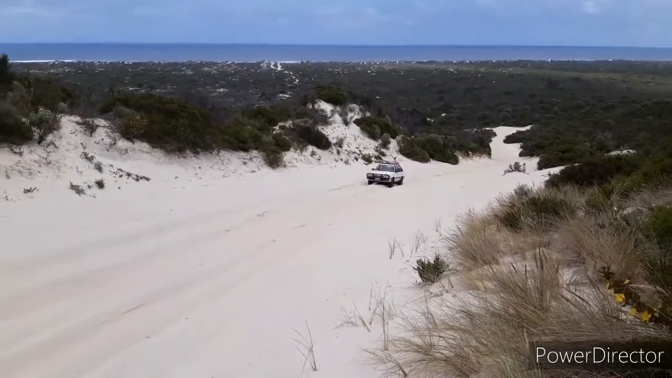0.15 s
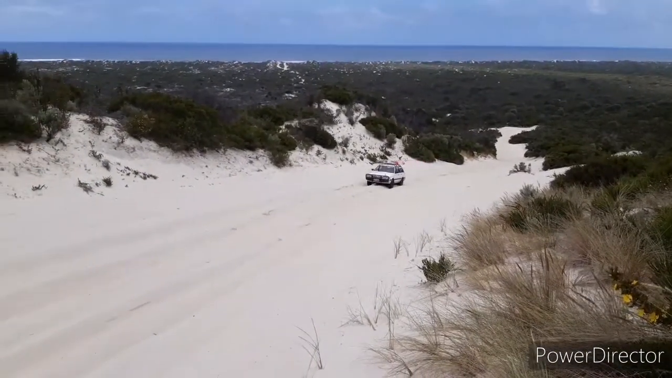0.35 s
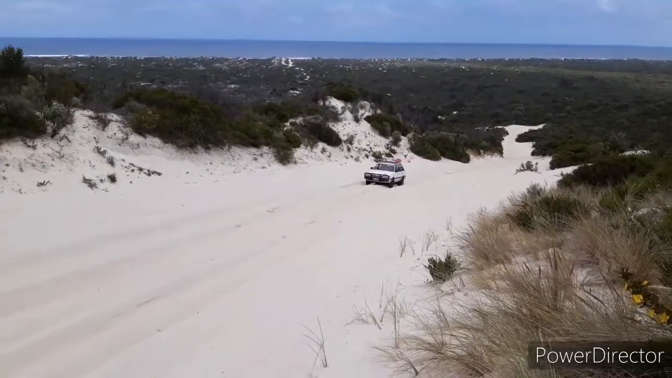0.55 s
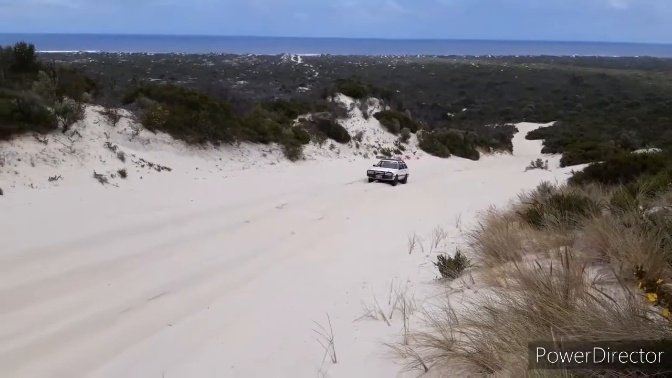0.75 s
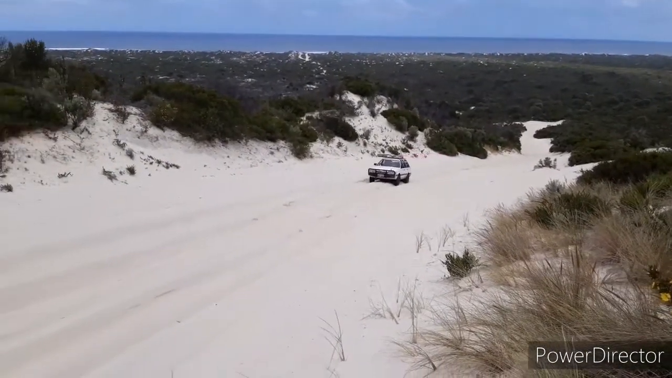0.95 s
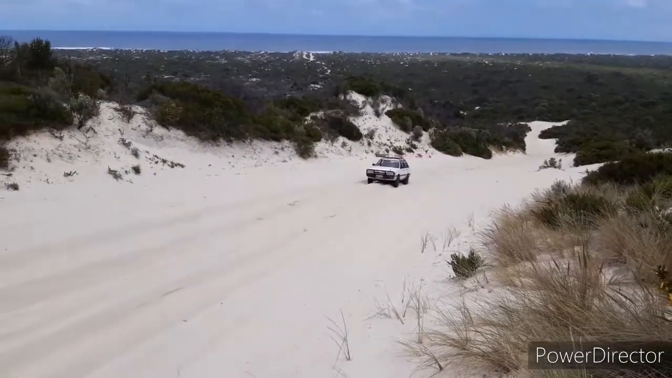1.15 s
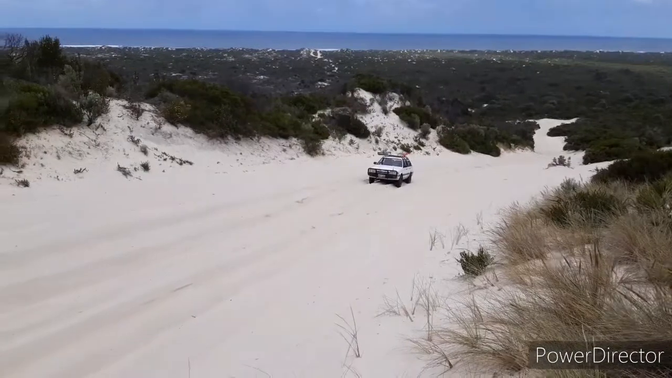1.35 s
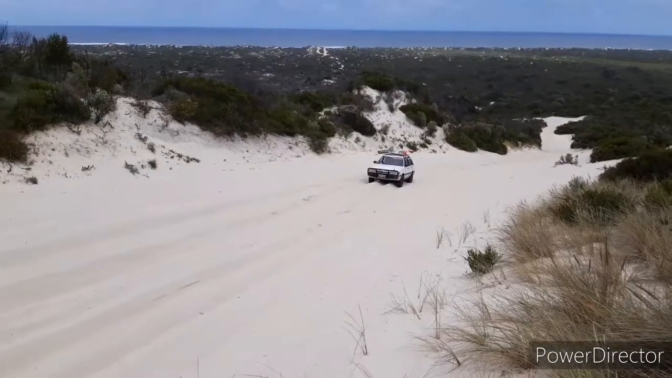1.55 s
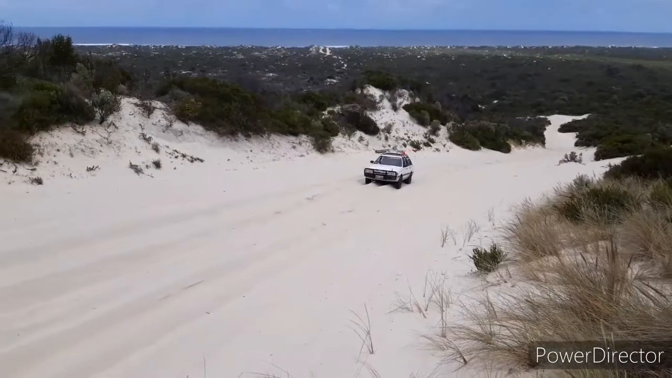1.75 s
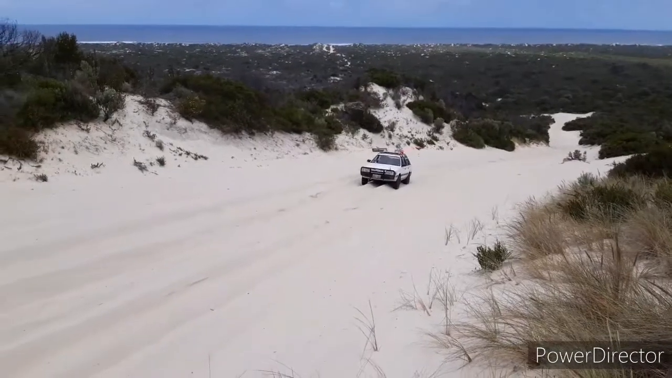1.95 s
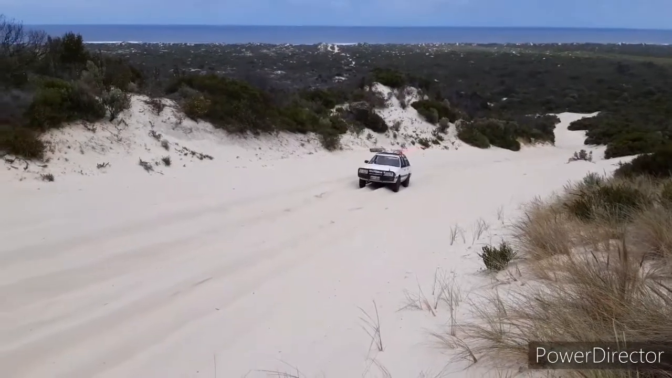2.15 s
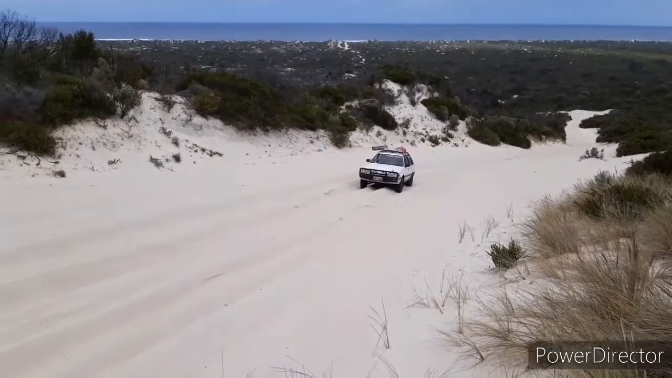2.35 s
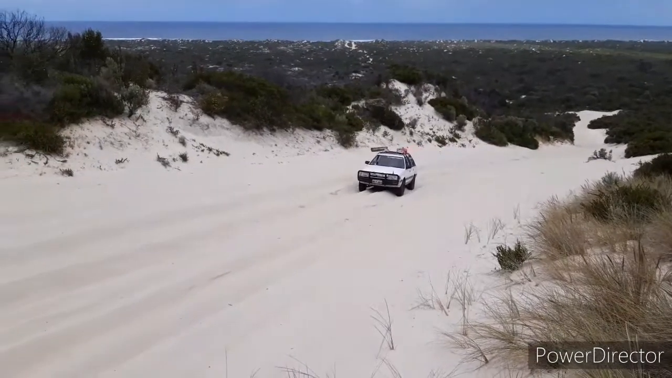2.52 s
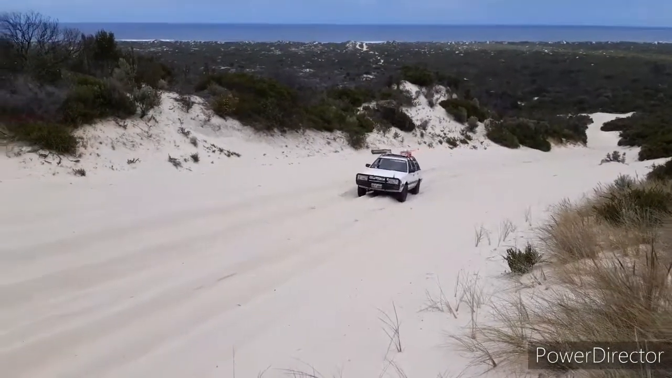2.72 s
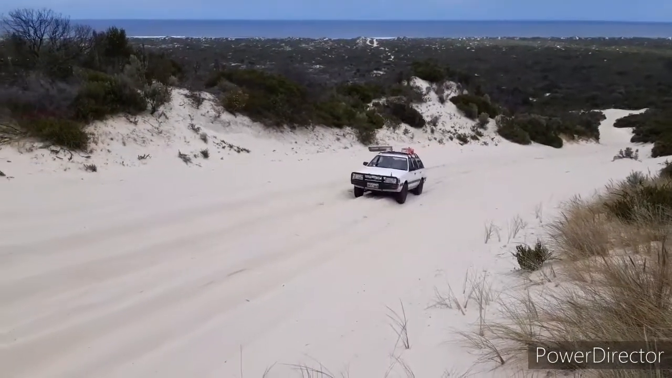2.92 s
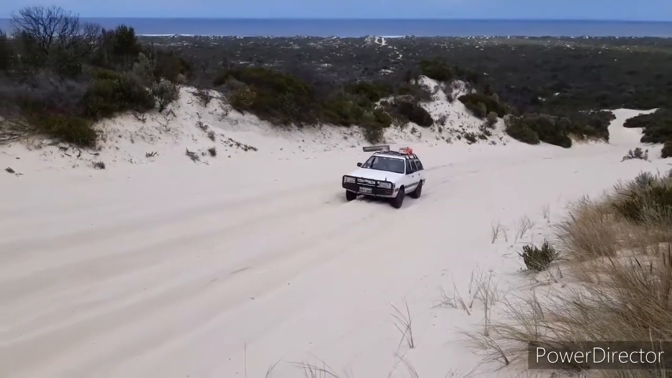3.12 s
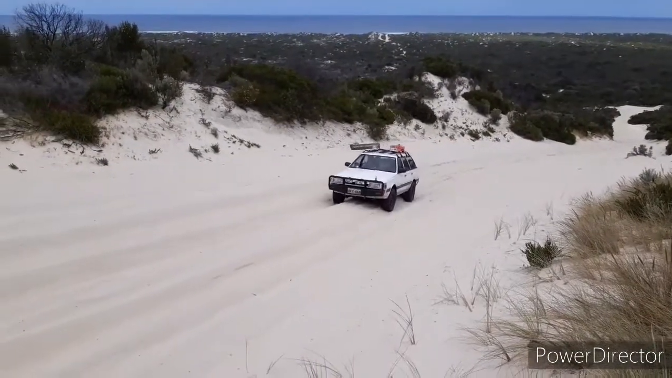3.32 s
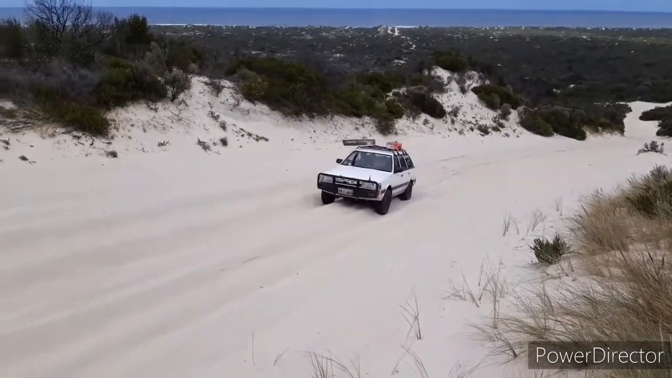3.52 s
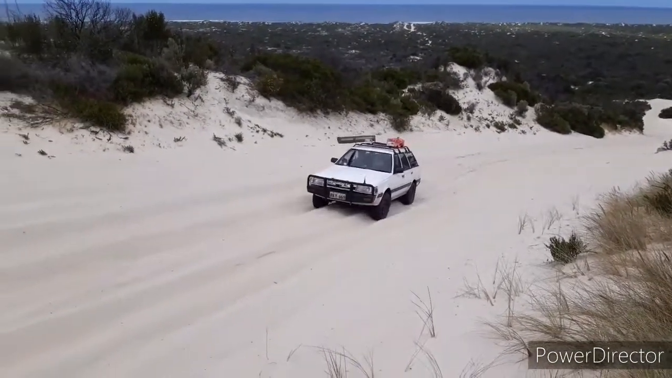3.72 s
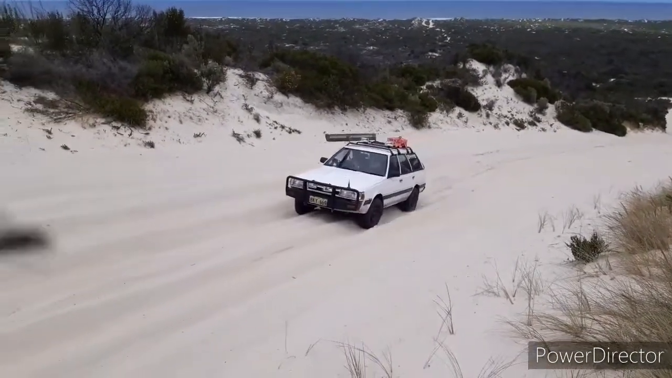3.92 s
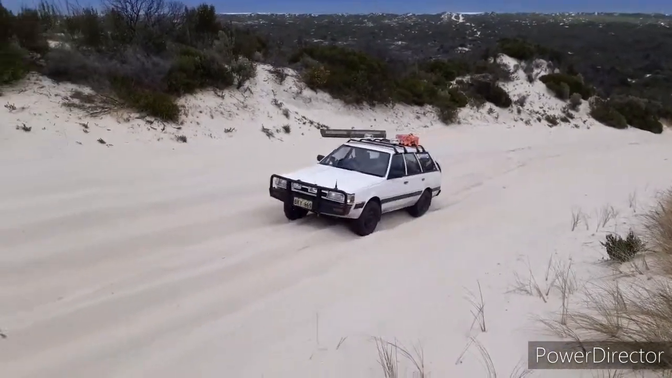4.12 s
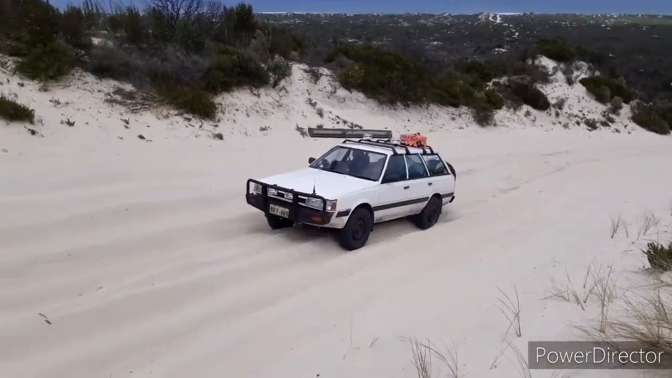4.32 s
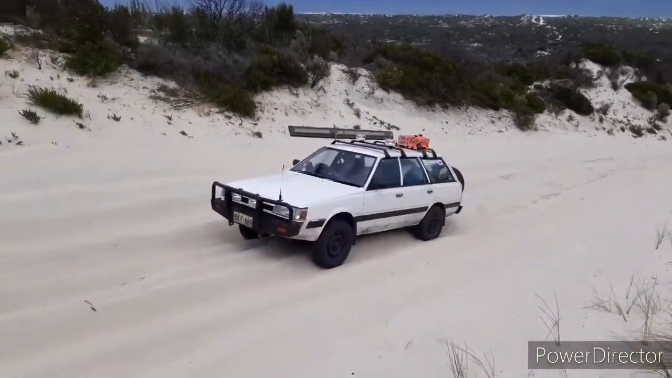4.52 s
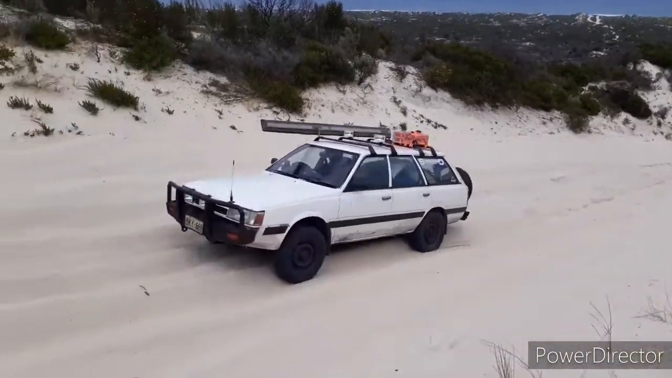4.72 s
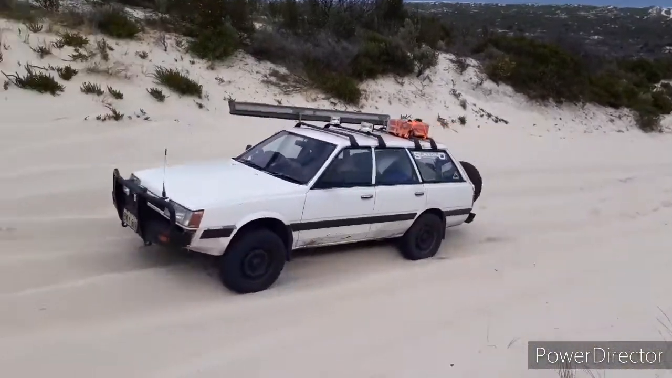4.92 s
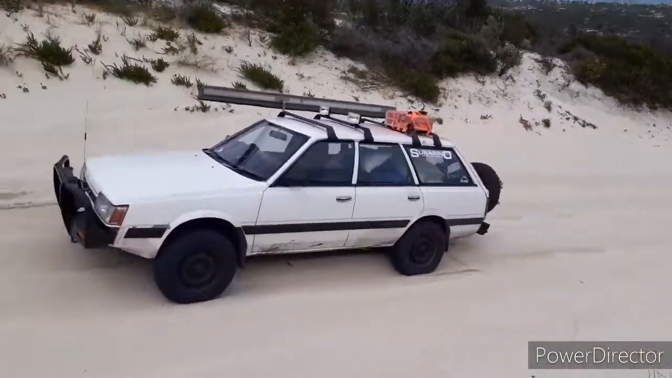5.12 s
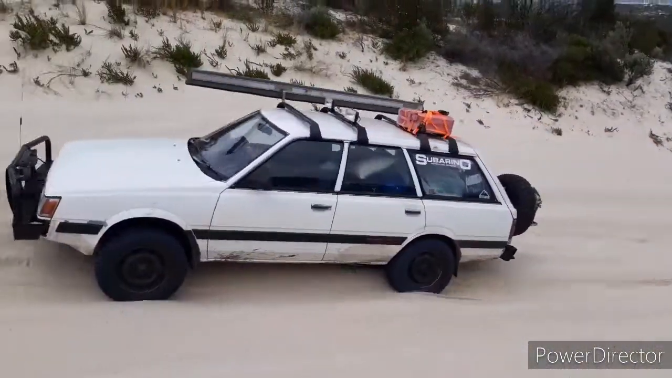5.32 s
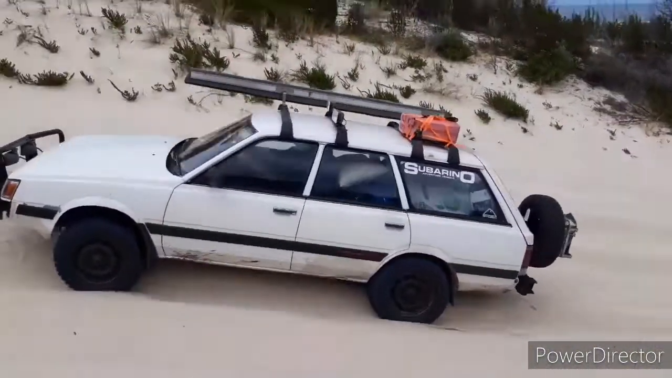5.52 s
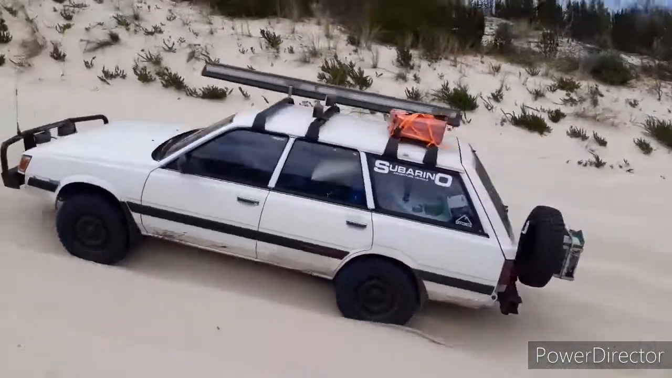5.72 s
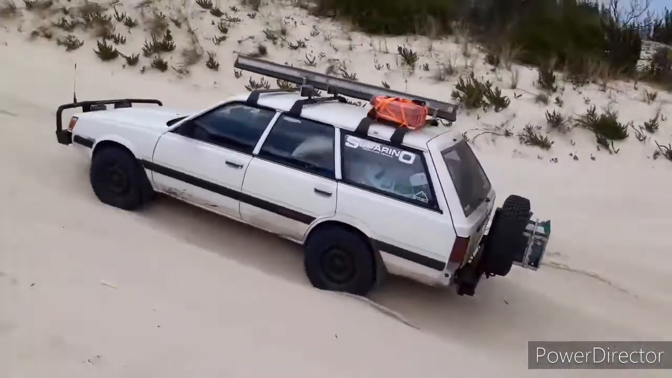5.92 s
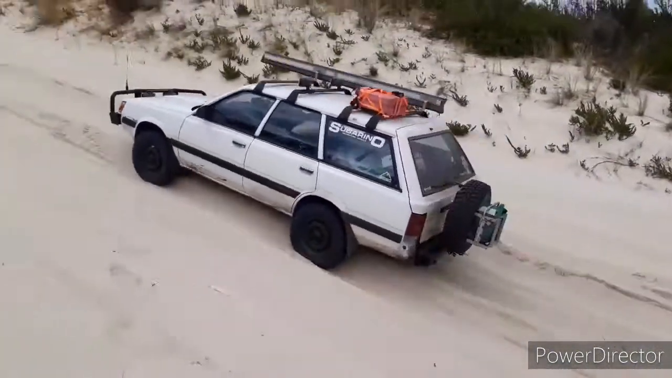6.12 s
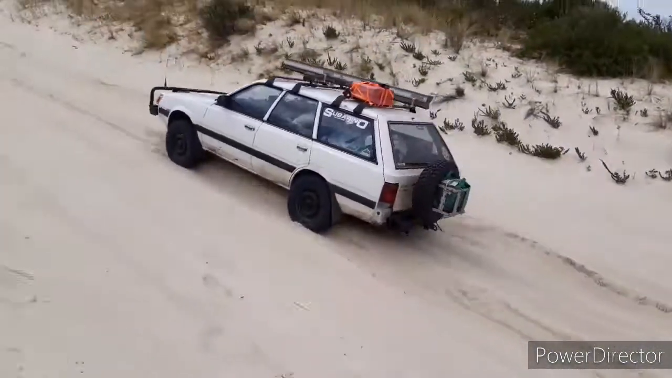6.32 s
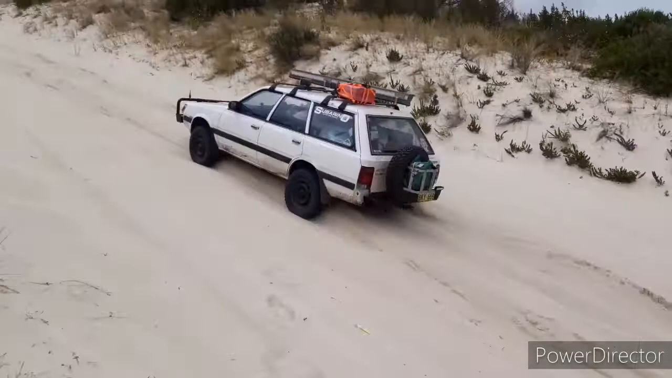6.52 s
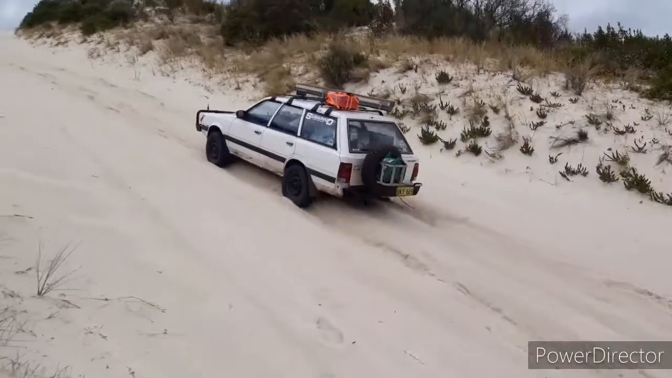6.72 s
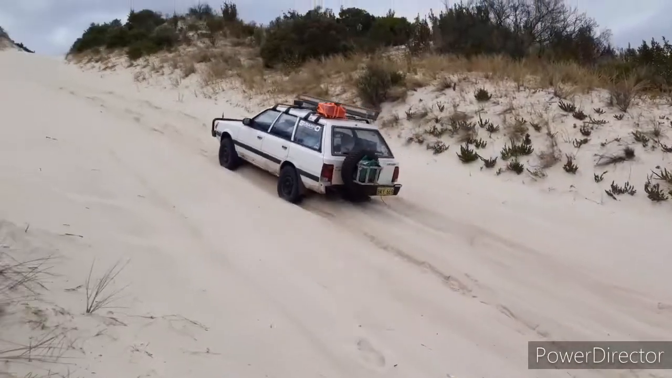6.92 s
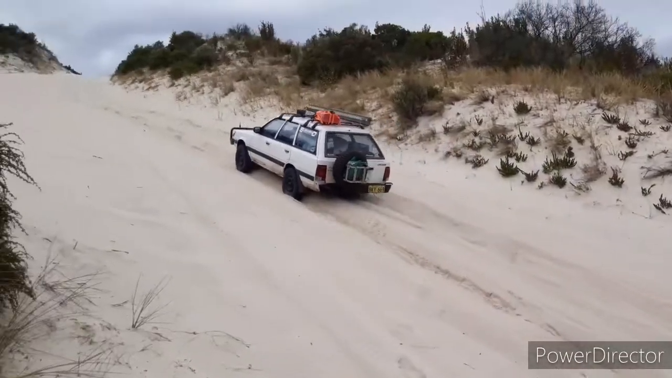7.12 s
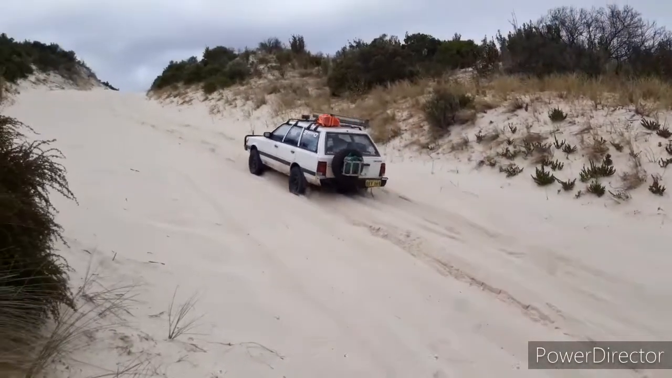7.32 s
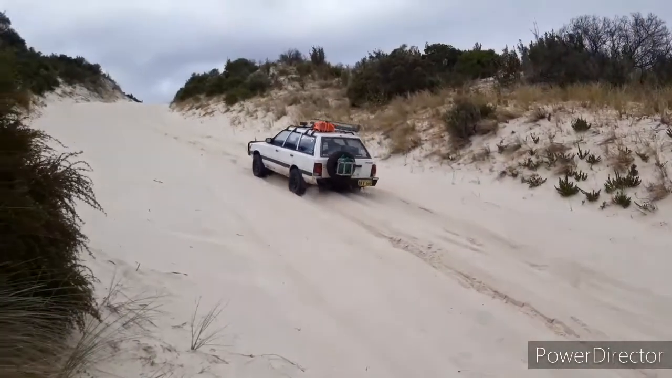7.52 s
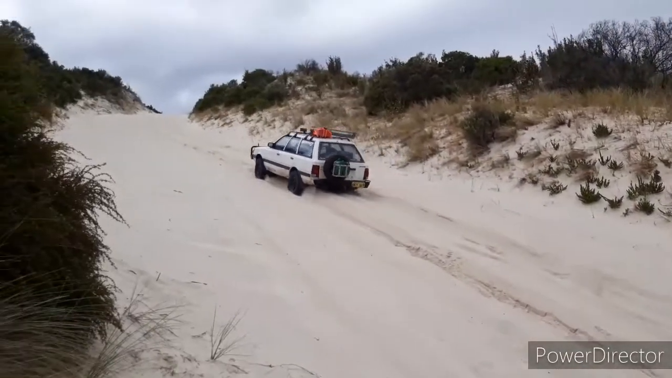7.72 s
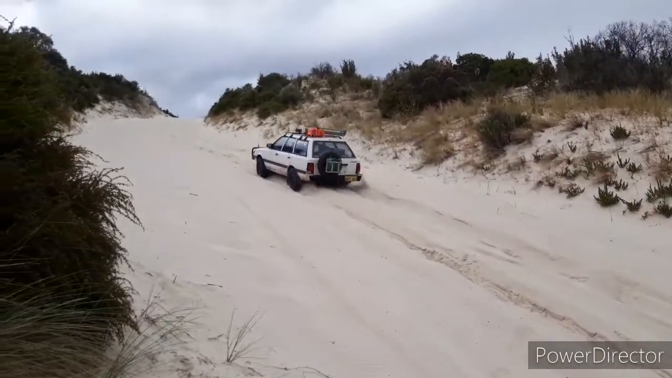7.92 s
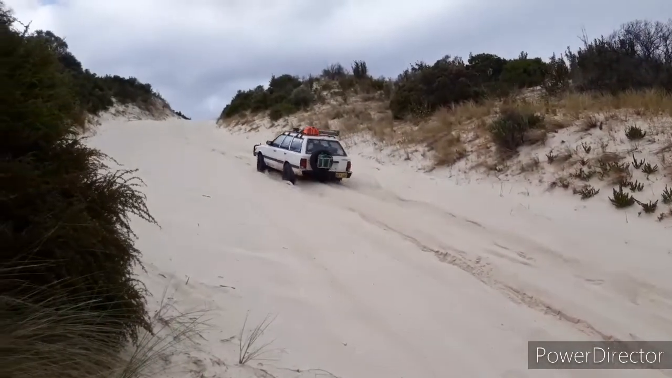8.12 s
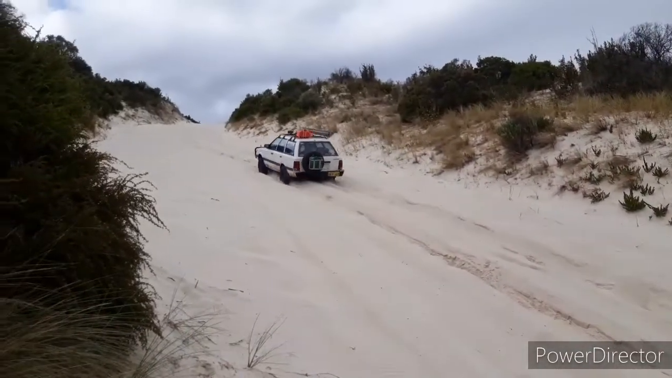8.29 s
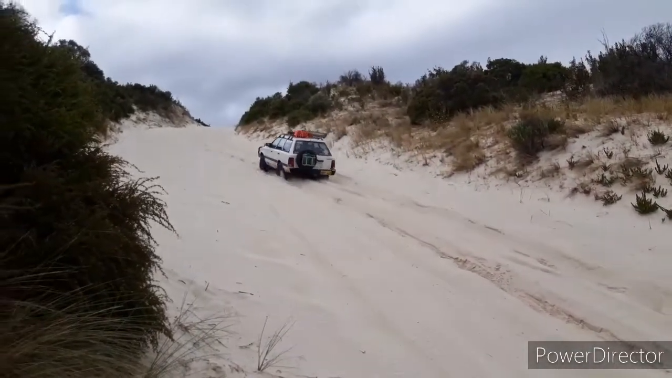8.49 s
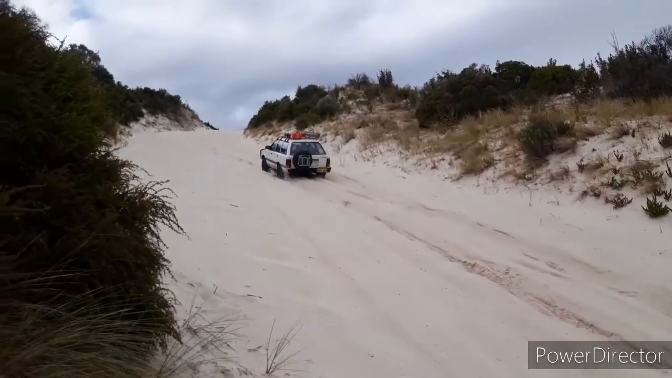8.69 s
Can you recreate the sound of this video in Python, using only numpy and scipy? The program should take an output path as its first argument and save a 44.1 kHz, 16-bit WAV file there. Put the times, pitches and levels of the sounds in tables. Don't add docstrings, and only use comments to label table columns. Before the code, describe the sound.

A station wagon pulls steadily uphill over soft sand, its throbbing hum swelling to a close pass before raspy tailpipe cracks recede up the slope.

```python
import sys
import numpy as np
from scipy import signal
from scipy.fft import rfft, irfft
from scipy.io import wavfile
from scipy.ndimage import uniform_filter1d, map_coordinates

SR = 44100
rng = np.random.default_rng(int(sys.argv[2]) if len(sys.argv) > 2 else 0)


def generate_wav(signal):
    frames = np.transpose(np.atleast_2d(signal))
    scaled = np.clip(frames, -1, 1) * 32767
    pcm = np.round(scaled).astype(np.int16)
    wavfile.write(sys.argv[1], SR, pcm)


def volts(x):
    e = np.asarray(x, float) / 20
    return 10 ** e


N = 385875
T = np.arange(N) / SR
HZ = np.fft.rfftfreq(N, 1 / SR)

# (time [s], engine cycles [1/s])
ENGINE_SPEED = [(0.0, 44), (0.34, 42.6), (0.68, 40.7), (1.14, 40), (2.19, 44), (2.34, 41.4), (2.41, 43.4),
                (3.38, 43), (3.53, 45), (3.75, 43.4), (4.0, 44.4), (4.68, 44.6), (4.85, 43.3), (5.55, 41.6),
                (6.63, 41), (7.8, 40.9), (8.7, 40.3), (8.75, 41.8)]
# (time [s], hum level [dB])
HUM_LEVEL = [(0, -41), (.7, -43), (1.3, -36), (2.3, -37.5), (3.1, -31.5), (3.85, -29.5), (4.3, -26.5),
             (5.1, -26), (5.4, -22.5), (6, -23), (6.25, -21), (6.75, -23.5), (7.1, -23), (7.4, -25.5),
             (8.75, -29)]
NEAR_DB = -30
# (multiple [1], level [dB])
NOSE_ORDERS = [(1, -59), (2, -17), (3, -1), (4, 0), (5, -1.5), (6, -4.5), (7, -2.5), (8, 0), (9, -63),
               (10, -32), (11, -10.5), (12, -6.5), (13, -17), (14, -15), (15, -19), (16, -11), (17, -10),
               (18, -12), (19, -45), (20, -25), (21, -44), (22, -49.5), (23, -19), (24, -36), (25, -48),
               (26, -27)]
TAIL_ORDERS = [(1, -40), (2, -40), (3, -3), (4, -3), (5, -3.5), (6, -10.5), (7, -14.5), (8, 0), (9, -9),
               (10, -62), (11, -9.5), (12, -5.5), (13, -8), (14, -11.5), (15, -15), (16, -15), (17, -7.5),
               (18, -23), (19, -3), (20, -31), (21, -35), (22, -47), (23, -60), (24, -19), (25, -26.5),
               (26, -30)]
# (time [s], half length [s], level [dB])
FIRING_TURNS = [
    (4.65, 0.67, 5.5),
    (6.05, 0.15, -8.5),
]
PIPE_TURNS = [(.15, 0.19, -4), (.4, 0.11, 4), (.9, .35, 10), (2.55, 0.24, -9), (2.31, 0.058, 7.5),
              (4.45, 0.45, -7), (5.25, 0.22, -5), (5.9, .25, 4), (8.6, .8, 4.5)]
UPPER_TURNS = [
    (3, .9, 3),
    (5.5, 1, -0.5),
    (6.25, .12, 3.5),
]
# (time [s], half length [s], level [dB])
SILL_BOOM = [
    (5.84, 0.3, 6.5),
    (4.7, 0.31, -6),
]
# (time [s], pitch [Hz], level [dB])
GEAR_WHINE = [(0.0, 785, -35.5), (0.56, 770.5, -35.5), (2.03, 790.6, -34), (4.09, 785.6, -23),
              (4.25, 787.4, -31), (4.79, 766.6, -17.5), (6.02, 788, -23), (6.18, 768.0, -23),
              (6.3, 790, -37)]
# (frequency [Hz], level [dB])
ROAR_COLOUR = [(25, -32), (60, -9), (110, 0.5), (250, 2.5), (350, -0.5), (420, -5.5), (520, -9),
               (700, -15.5)]
BLOCK_COLOUR = [(350, -32), (500, -8.5), (650, 0), (780, 7.5), (900, -4.5), (1000, -19), (1300, -24.5)]
# (time [s], half length [s], level [dB])
WIND_GUSTS = [
    (8.32, 0.51, 5.17),
    (2.22, 0.46, 4.5),
    (0.37, 0.07, 4),
]
# (time [s], level [dB])
FAN_LEVEL = [(0, -31.5), (1.7, -31), (2.05, -29.5), (3.5, -26.5), (4.2, -26.5), (4.7, -25), (5.3, -29),
             (5.5, -32), (5.7, -38), (5.9, -42)]
# (frequency [Hz], level [dB])
NOSE_COLOUR = [(500, -11.5), (850, -20.5), (1000, -7.5), (1500, -9.5), (2000, -12), (3300, -11.5),
               (5000, -15), (6500, -19.5), (8500, -34.5), (12000, -32.5), (14300, -36.5), (15600, -41)]
# (time [s], half length [s], level [dB])
SAND_SHADE = [(5.3, 0.57, -3.5)]
# (time [s], half length [s], level [dB])
BODY_SCATTER = [(5.3, 1, 9)]
GRIT_SCATTER = [(5.6, .45, 5)]
# (time [s], half length [s], delay [ms])
ECHO_SHORTER = [(5.3, 1.1, -.2)]
# (time [s], half length [s], share [1])
ECHO_LOST = [(5.55, .5, -.9)]
# (time [s], half length [s], left over right [dB])
PAN_TURNS = [
    (1.5, 1.2, -.5),
    (5.7, .25, .8),
    (8.75, .8, -1),
]
# (time [s], level [dB])
CRACK_LEVEL = [(5.3, -38), (6.1, -33.5), (6.25, -30), (6.73, -29.5), (6.96, -34), (7.1, -32.5),
               (7.32, -34.5), (7.48, -40), (7.9, -40), (8.05, -36.5), (8.2, -38.5), (8.5, -36), (8.75, -40)]
FIRING_STRENGTH = [0, -12, -7, -12]
# (frequency [Hz], level [dB])
TAIL_COLOUR = [(500, -75), (850, -11.5), (903, -28), (1010, 5.5), (1150, -34), (1300, -2), (1780, -8),
               (1990, -12.5), (2680, -13), (3040, 2.5), (3730, 5.5), (4500, 11.5), (5200, 12), (6450, -2.5),
               (8550, -23.5), (11700, -22), (15500, -23)]
FAR_COLOUR = [(500, -16), (850, -12), (1010, -7.5), (1290, -19.5), (1810, -17), (1910, -35), (2050, -13),
              (2330, -12), (2530, -25), (2910, -12), (3400, -8), (3700, -18), (3820, 0), (4020, 0),
              (4260, -14), (4550, -6), (5450, -12), (9500, -46.5), (20900, -120)]
# (frequency [Hz], width [Hz], level [dB])
PIPE_RINGS = [(3037, 38, 4.5), (3514, 220, 1.5), (4550, 300, 3), (6030, 150, 5), (7100, 140, -3)]
# (time [s], half length [s], level [dB])
PIPE_AIM = [(6.9, 0.22, 8.2)]
SPIT_AIM = [(6.55, 0.77, 7.1)]
SILENCER_AIM = [(6.05, 0.66, 19.5)]
# (frequency [Hz], time [s], half length [s], level [dB])
SILENCER_FACES = [(930, 6, 0.24, -1.5), (1710, 5.66, 0.75, 1.5), (2027, 6.38, 0.78, 3),
                  (2082, 5.28, 0.32, 13.5), (2310, 7.156, 0.44, 11), (1290, 6.66, 0.35, 0)]
# (frequency [Hz], left over right [dB])
PORT_COLOUR = [(60, -1.5), (150, 0.5), (380, 1.5), (950, 1), (2380, 3), (5980, -3), (15000, 4)]


def evened(x):
    return x / np.sqrt(np.mean(x ** 2) + 1e-20)


def curves(rows):
    seconds, *columns = np.transpose(rows)
    return [np.interp(T, seconds, column) for column in columns]


def swells(rows):
    return sum(size * np.exp(-((T - s) / half) ** 2) for s, half, size in rows)


def step(s, length):
    return 1 / (1 + np.exp((s - T) / length))


def drift(seconds):
    size = int(seconds * SR)
    once = uniform_filter1d(rng.standard_normal(N), size)
    return evened(uniform_filter1d(once, size))


def follows(lead_db, level_db, slope):
    return level_db + slope * (lead_db - NEAR_DB)


def coloured(x, points):
    f, db = np.transpose(points)
    log_gain = np.log(volts(np.interp(np.log(HZ + 1), np.log(f), db, left=-70, right=-70)))
    cepstrum = irfft(log_gain, N) * np.where(T < T[-1] / 2, 2, 0)
    cepstrum[0] /= 2
    return irfft(rfft(x) * np.exp(rfft(cepstrum)), N)


def three_bands(x, levels_db):
    spectrum = rfft(x)
    above_low, above_middle = [1 / (1 + (edge / (HZ + 1)) ** 12) for edge in (2800, 7500)]
    parts = (1 - above_low, above_low - above_middle, above_middle)
    return sum(volts(db) * evened(irfft(spectrum * part, N)) for part, db in zip(parts, levels_db))


def resonate(x, hz, width):
    spin = np.exp(2j * np.pi * np.cumsum(hz * np.ones(N)) / SR)
    r = np.exp(-np.pi * width / SR)
    return 2 * (spin * signal.lfilter([1 - r], [1, -r], x / spin)).real


def delayed(x, ms):
    return map_coordinates(x, [np.arange(N) - ms * SR / 1000], order=3, mode="nearest")


def frozen(turns):
    return np.interp(1000 * (turns % 1), np.arange(1001), rng.standard_normal(1001))


def hum(turns, tail):
    near_db = curves(HUM_LEVEL)[0]
    groups = (near_db,
              follows(near_db, -27.5, 1.08) + swells(FIRING_TURNS),
              follows(near_db, -23.5, 1.01) + swells(PIPE_TURNS),
              follows(near_db, -37, 0.72) + swells(UPPER_TURNS))
    base_db, firing_db, pipe_db, upper_db = [db + 1.5 * step(4.7, -0.29) * drift(0.1) for db in groups]
    front, rear = dict(NOSE_ORDERS), dict(TAIL_ORDERS)
    out = np.zeros(N)
    for k in front:
        if k == 4:
            lead, db = 4, firing_db
        elif k == 8:
            lead, db = 8, pipe_db
        elif k < 8:
            lead, db = 3, base_db
        else:
            lead, db = 12, upper_db
        db = db + (1 - tail) * (front[k] - front[lead]) + tail * (rear[k] - rear[lead])
        db = uniform_filter1d(db, size=3000)
        db = db - 20 * (1 - tail) * (k >= 18)
        db = db + (k in (6, 7)) * swells(SILL_BOOM)
        waver = drift(0.11)
        late = (min(0.22 * (k - 1.5), 1.6) + 1.2 * (k == 8)) / (2 * np.pi * k)
        scramble = (1 - tail + tail * (k > 9) / 2) * rng.uniform(-1.1, 1.43)
        blur = 0.45 * np.roll(waver, 9000) + scramble
        out -= np.sqrt(2) * volts(db + 0.97 * waver) * np.cos(2 * np.pi * k * (turns - late) + blur)
    return out


def gear_whine():
    hz, db = [uniform_filter1d(c, size=4000) for c in curves(GEAR_WHINE)]
    turns = np.cumsum(hz) / SR
    fuzz = evened(resonate(resonate(rng.standard_normal(N), hz, 50), hz, 53))
    octave_level = volts(-6 + 2 * drift(0.065)) * np.clip((4.5 - T) / 0.8, 0, 1)
    octave = octave_level * np.sin(4 * np.pi * turns + 0.5 * drift(0.05))
    return volts(db) * (np.sqrt(2) * np.sin(2 * np.pi * turns) + 0.3 * fuzz + octave)


def tyre_and_block_noise(tyres_db, block_db):
    tyres = evened(coloured(rng.standard_normal(N), ROAR_COLOUR))
    block = evened(coloured(rng.standard_normal(N), BLOCK_COLOUR))
    return volts(tyres_db + 11 + 0.75 * drift(0.06)) * tyres + volts(block_db + 7.5) * block


def wind():
    rumble = resonate(resonate(rng.standard_normal(N), 60, 50), 60, 60)
    return volts(-49.5 + 3 * drift(0.1)) * evened(rumble)


def roar(turns, tail):
    near_db = curves(HUM_LEVEL)[0]
    tyres_db = follows(near_db, -42.5, 0.11) + swells(WIND_GUSTS)
    block_db = follows(near_db, -36.5, 0.73) - 8.5 * tail
    throb = 1 + 0.4 * np.cos(2 * np.pi * turns)
    alike, other = [tyre_and_block_noise(tyres_db, block_db) for _ in range(2)]
    unlike = 0.52 * np.array([other, -other])
    return throb * (alike + unlike) + [wind(), wind()]


def nose_levels(tail):
    fan_db = curves(FAN_LEVEL)[0]
    sand_db = follows(fan_db, -32.5, 0.61) + swells(SAND_SHADE)
    fizz_db = follows(fan_db, -47.5, 0.75) + 18.5 * tail + 1.6 * drift(0.09)
    return fan_db, sand_db, fizz_db


def nose(turns, side_on, tail):
    tick = 1 + 0.5 * np.exp(-(4 * turns % 1) / 0.9) + 0.5 * np.exp(-(turns % 1) / 0.087)
    noise = rng.standard_normal(N) * tick * volts(0.67 * drift(0.019))
    noise = noise + 8 * side_on * resonate(noise, 1530, 200)
    return three_bands(coloured(noise, NOSE_COLOUR), nose_levels(tail))


def heard(x, lead_ms, echo_ms, echo):
    soft = signal.filtfilt(*signal.butter(2, [1100, 3400], "band", fs=SR), x)
    left = x - 0.85 * echo * delayed(soft, echo_ms - 0.08)
    right = x - echo * delayed(soft, echo_ms)
    return np.array([delayed(left, -lead_ms / 2), delayed(right, lead_ms / 2)])


def tail_levels():
    crack_db = curves(CRACK_LEVEL)[0]
    ring_db = follows(crack_db, -39, 0.56)
    spit_db = follows(crack_db, -49.5, 1.4) + swells(SPIT_AIM) + 2 * drift(0.045)
    return ring_db, crack_db, spit_db


def scatter(tail):
    noise = [coloured(rng.standard_normal(N), NOSE_COLOUR) for _ in range(2)]
    car_db = (1 - tail) * np.array(nose_levels(tail)) + tail * (np.array(tail_levels()) + 3.5)
    body_db = swells(BODY_SCATTER)
    thrown_db = car_db - [[14], [11], [3.5]] + np.array([body_db, body_db, swells(GRIT_SCATTER)])
    levels_db = np.maximum(thrown_db, [[-58], [-54], [-54.5]])
    return np.array([three_bands(n, levels_db) for n in noise])


def silencer(turns):
    shake = frozen(turns) + 2.5 * frozen(4 * turns) + 0.36 * rng.standard_normal(N)
    shell = np.zeros(N)
    for hz, s, half, db in SILENCER_FACES:
        face = evened(resonate(resonate(shake, hz, 230), hz, 230))
        shell += volts(db) * swells([(s, half, 1)]) * face
    return volts(-54 + swells(SILENCER_AIM)) * shell


def firing_bursts(turns):
    count = np.floor(4 * turns).astype(int)
    strength = volts(np.array(FIRING_STRENGTH)[count % 4] + 0.9 * rng.standard_normal(N)[count])
    since = (4 * turns % 1) / (4 * np.gradient(turns) * SR)
    burst = strength ** 1.7 * since / 0.0003 * np.exp(-since / 0.00033)
    crack = np.zeros(N)
    for hz, db in ((5240, -1.5), (7100, -1), (10200, 1), (11600, 5.5), (3540, -8)):
        pitch = hz * (1 + 0.028 * rng.standard_normal(N)[count])
        crack += volts(db) * np.sin(2 * np.pi * pitch * since)
    fade = strength * np.exp(-since / 0.0014)
    rattle = (fade + 0.17) * frozen(turns)
    puff = (fade + 0.15) * rng.standard_normal(N)
    return 0.75 * evened(burst * crack) + 0.5 * evened(rattle) + 0.3 * evened(puff)


def pipe_rings(drive):
    out = np.zeros(N)
    for hz, width, db in PIPE_RINGS:
        db = db + 2.5 * drift(0.051) + (hz < 3300) * swells(PIPE_AIM) - 2 * step(7.82, 0.13)
        out += volts(db) * resonate(drive, hz, width)
    return out


def tailpipe(turns):
    drive = firing_bursts(turns)
    drive = drive + pipe_rings(drive)
    ring_db, crack_db, spit_db = tail_levels()
    far = np.clip((T - 7.2) / 0.35, 0, 1)
    gone_db = 10 * np.log10(1 - far + 1e-4)
    near_part = three_bands(coloured(drive, TAIL_COLOUR), (ring_db + gone_db, crack_db + gone_db, spit_db))
    far_part = three_bands(coloured(drive, FAR_COLOUR), (ring_db, crack_db, -99))
    return near_part + silencer(turns) + np.sqrt(far) * far_part


def scene():
    tail = step(5.62, 0.17)
    nose_swing_ms = -0.02 + 0.4 * step(5.02, 0.46)
    tail_swing_ms = -0.11 + 0.18 * step(6.55, 0.5)
    echo_ms = 1.775 + swells(ECHO_SHORTER)
    echo = (0.95 + (0.35 - 0.95) * tail) * (1 + swells(ECHO_LOST))
    pan_db = swells(PAN_TURNS)
    rate = uniform_filter1d(curves(ENGINE_SPEED)[0], size=5000)
    turns = np.cumsum(rate * (1 + 0.003 * drift(0.03))) / SR
    turns = turns + 0.43
    low = hum(turns - 0.024, tail) + step(6.2, -0.1) * gear_whine()
    lead_ms = (1 - tail) * nose_swing_ms + tail * tail_swing_ms
    car = np.array([delayed(low, -lead_ms / 2), delayed(low, lead_ms / 2)])
    car += roar(turns, tail)
    front = np.sqrt(1 - tail) * volts(0.5) * nose(turns, nose_swing_ms, tail)
    car += heard(front, nose_swing_ms, echo_ms, echo)
    rear = np.sqrt(tail) * volts(5.0) * tailpipe(turns)
    car += heard(rear, tail_swing_ms, echo_ms, echo)
    return car * volts(np.array([pan_db, -pan_db]) / 2) + scatter(tail)


def roll_off(x):
    return signal.sosfilt(signal.butter(12, 15720, fs=SR, output="sos"), x)


def record(dry):
    f, db = np.transpose(PORT_COLOUR)
    tilt = volts(np.interp(np.log(HZ + 1), np.log(f + 1), db) / 2)
    ports = irfft(rfft(dry) * np.array([tilt, 1 / tilt]), N)
    return roll_off(np.clip(ports, -1, 1))


dry = scene()
out = record(dry)
generate_wav(out)
```